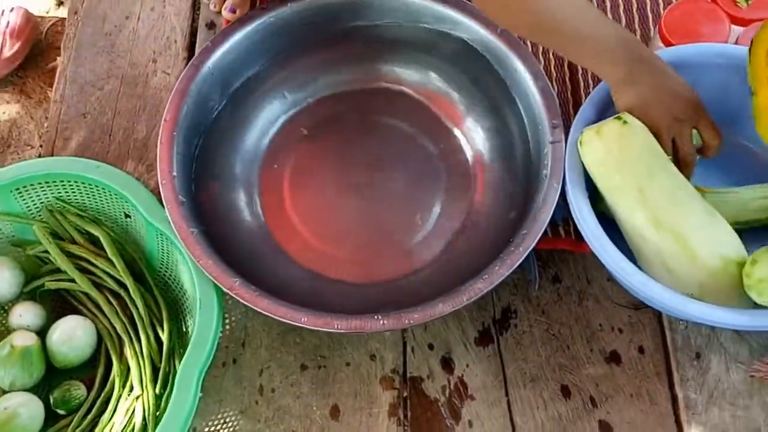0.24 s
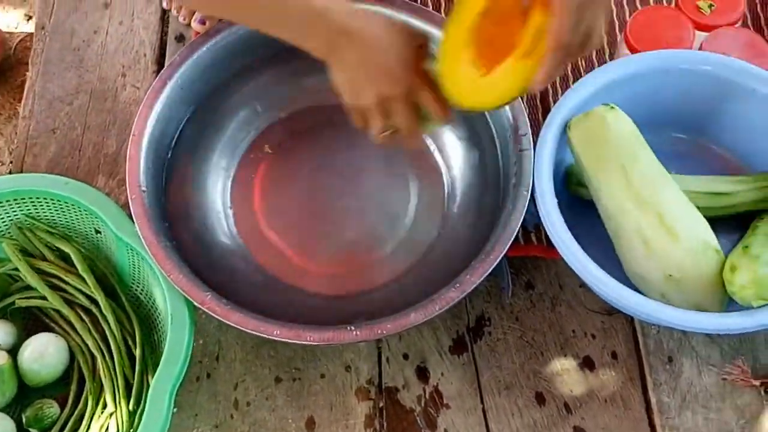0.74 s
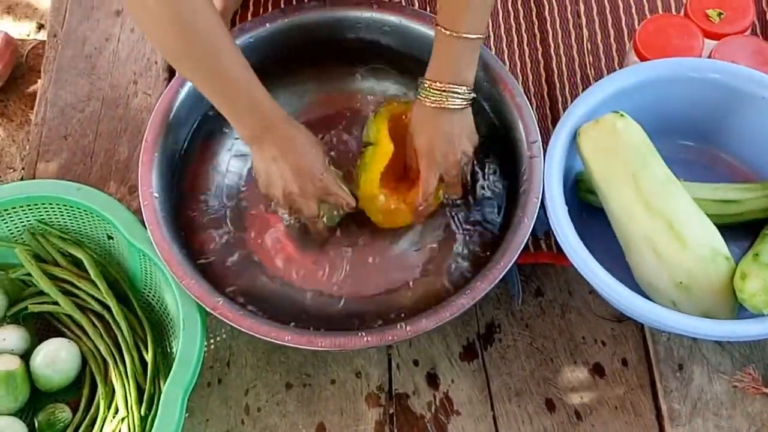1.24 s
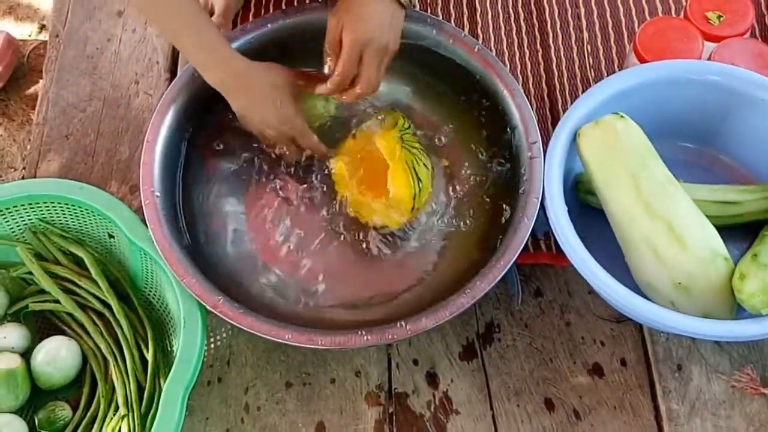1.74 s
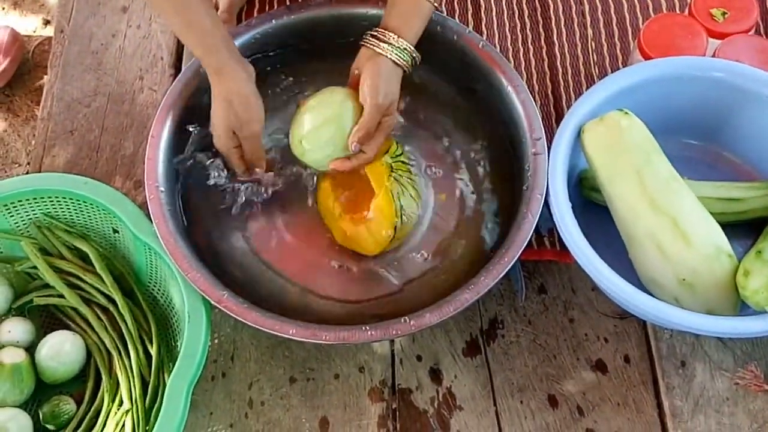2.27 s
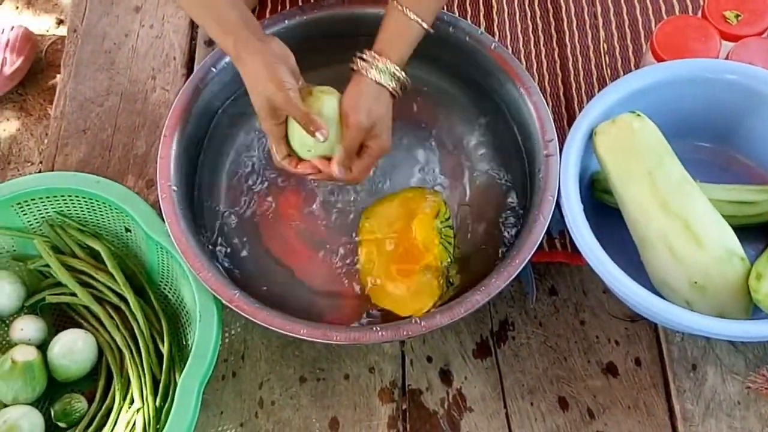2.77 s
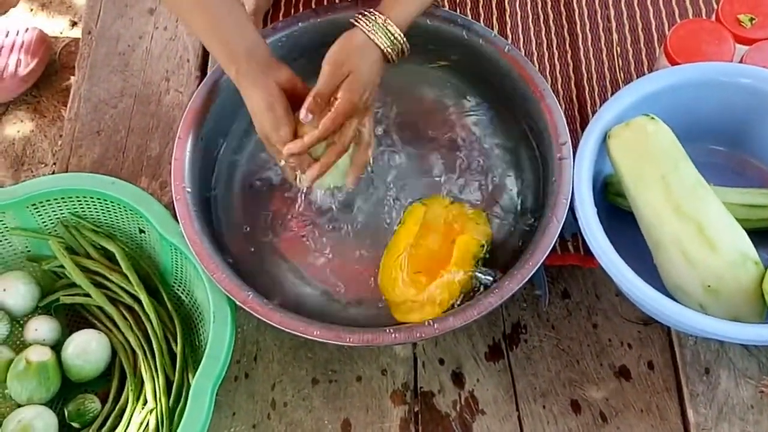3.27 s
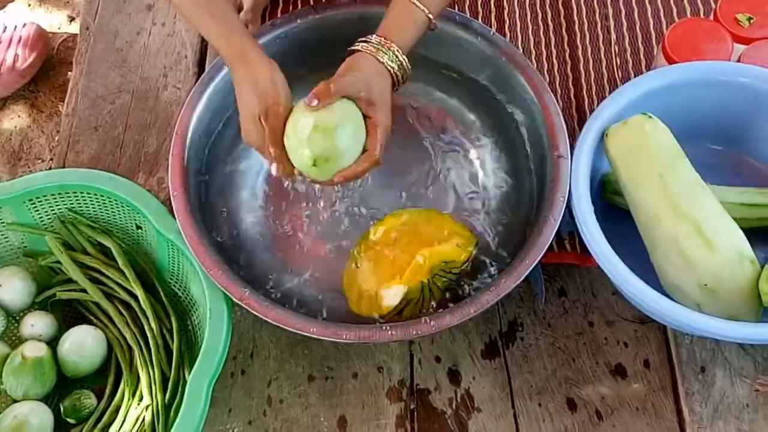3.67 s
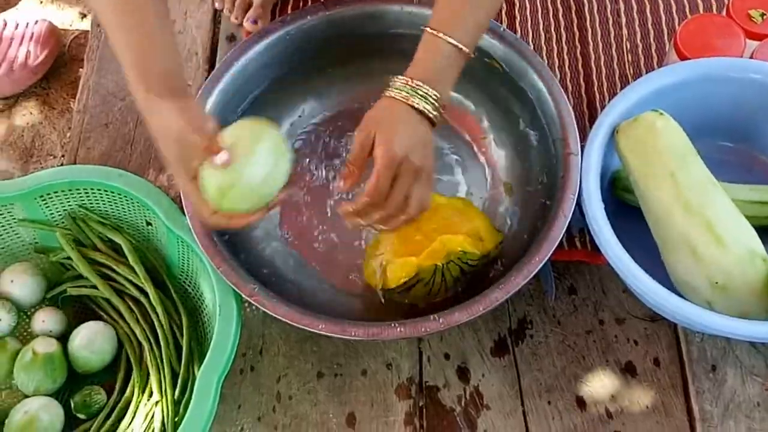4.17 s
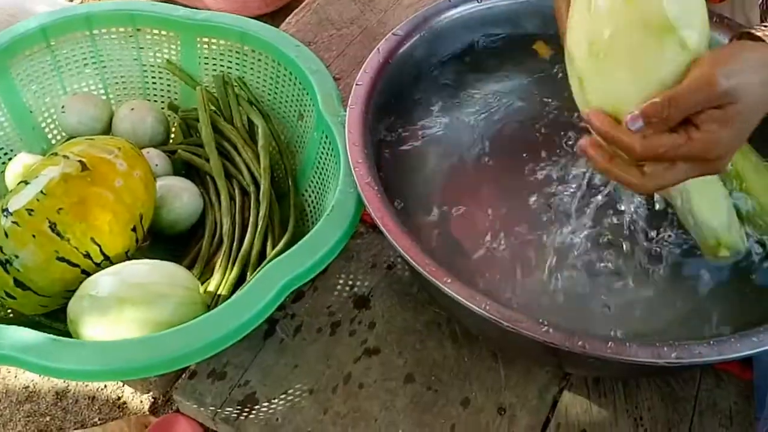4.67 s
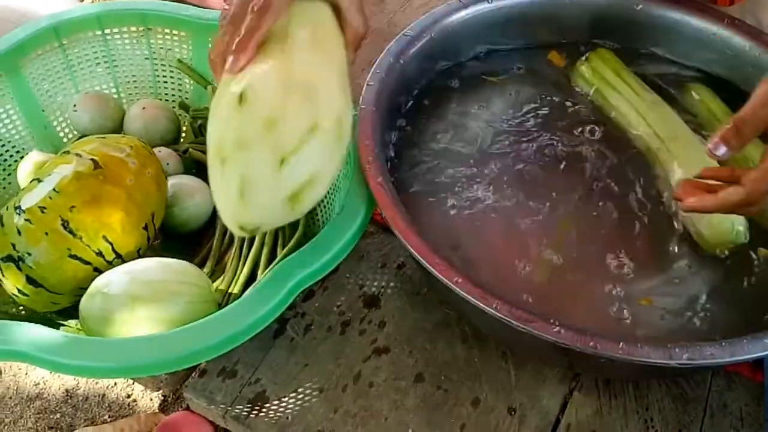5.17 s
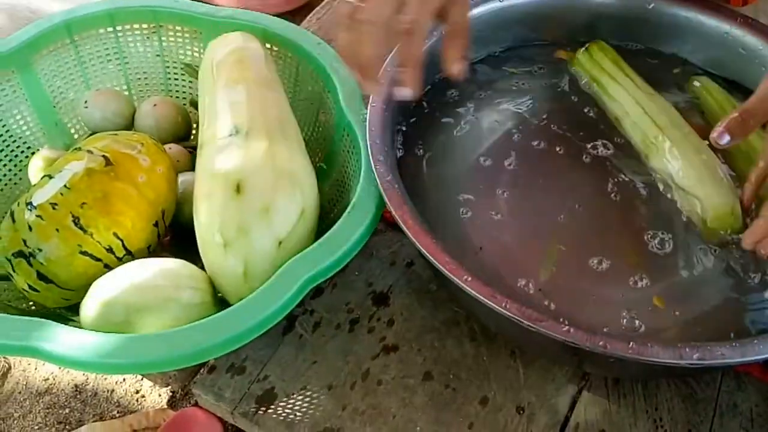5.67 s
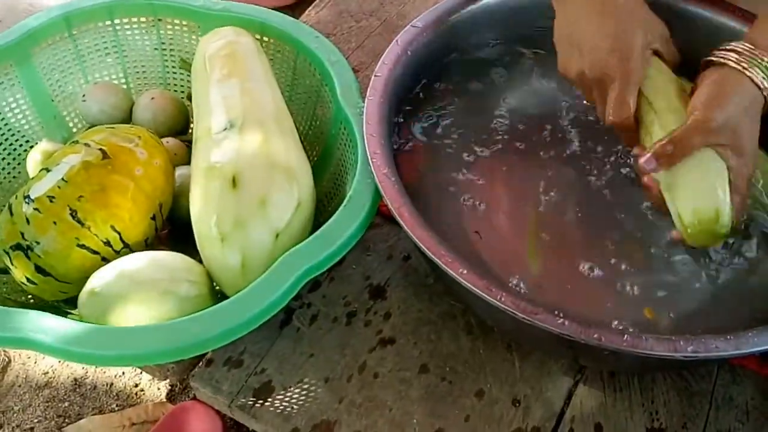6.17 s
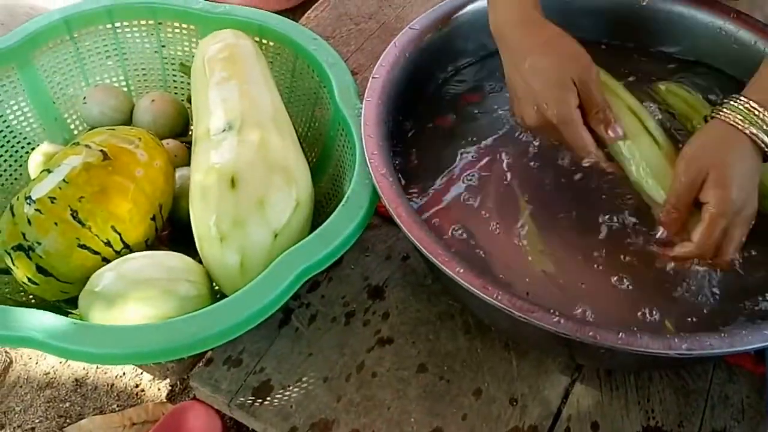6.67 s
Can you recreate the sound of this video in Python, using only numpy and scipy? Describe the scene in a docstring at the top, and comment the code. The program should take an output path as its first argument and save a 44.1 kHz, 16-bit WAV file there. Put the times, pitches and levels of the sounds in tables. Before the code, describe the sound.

Steady deep mortar thuds about twice a second, with hands stirring and dripping water in a metal basin, sharper wooden knocks joining near the end.

```python
"""A wooden deck in a yard: hands rinse vegetables in a metal basin while someone pounds a mortar at a steady pace.
Blows and knocks are dying sines with a click of noise; the grains they shake hiss a moment later.
Drops are short rings that may glide up in pitch; stirred water is many tiny rings over patchy noise.
Spray and drizzle are ticks and puffs of noise, a bird chirps in wavering sines, the basin hums faintly,
and slow, deep noise makes the breeze and its gusts on the microphone."""
import sys
import numpy as np
from scipy import signal
from scipy.io import wavfile
from scipy.ndimage import uniform_filter1d

SR = 44100
rng = np.random.default_rng(int(sys.argv[2]) if len(sys.argv) > 2 else 0)


def wav_out(sig):
    """Save sig, one row per channel (or a flat mono array), as 16-bit PCM at SR to the path in sys.argv[1]."""
    wavfile.write(sys.argv[1], SR, np.round(np.clip(np.atleast_2d(sig).T, -1, 1) * 32767).astype(np.int16))


N = 305613  # length in samples
CHANGE_S = 4.1  # from here the hiss of the hits takes another colour and the deep group is fainter

# pestle blows: start_s, boom_db, octave_db, knock_db, crack_db, hiss_db (shaken grains), sizzle_db, slosh_db
BLOWS = [(-.008, -14.5, -21.5, -27, -37.5, -39, -39.5, -55),
         (0.514, -19.5, -23.5, -22.5, -39, -37.5, -39.5, -58.5),
         (1.038, -14.5, -16, -18.5, -45, -37.5, -40.5, -58.5),
         (1.559, -20, -32.5, -27, -41, -43.5, -44, -56), (2.059, -13.5, -19.5, -17.5, -33, -38, -39, -61),
         (2.582, -14.5, -21.5, -20.5, -37.5, -39, -37.5, -56),
         (3.099, -14, -18, -17.5, -38.5, -38.5, -38, -51), (3.618, -15.5, -15, -16, -31.5, -37.5, -38, -57),
         (4.155, -18, -17, -14.5, -22, -38, -36, -35.5), (4.714, -17, -15, -15.5, -22.5, -36, -42.5, -47.5),
         (5.232, -16, -15.5, -19, -26, -38.5, -41.5, -48), (5.749, -16, -15.5, -17, -33.5, -37, -46, -47),
         (6.272, -24, -18, -17, -19, -35.5, -45.5, -39.5),
         (6.775, -21.5, -25.5, -13.5, -26, -50.5, -46, -52)]
# what the mortar and boards ring with: pitch_hz, level_db, t60_s (time to fade by 60 dB),
# group (rounded, halves to even: 0 boom, 1 octave, 2 knock, 3 crack, 4 deep)
BOARDS = [(260, 10, .025, 1), (105.4, -3, 0.27, 4), (1760, -5, 0.05, 3.5), (2380, -0.5, 0.034, 3.5),
          (157.3, 2, 0.11, 0), (204.7, -0.5, 0.12, 0), (299.3, 5, 0.098, 1), (345, -3, 0.092, 0.5),
          (239, -0.5, 0.079, 1.5), (560, -2, 0.0446, 2), (752, -3.5, 0.064, 2.5), (830, -18.5, 0.15, 1)]
# hands in the basin: start_s, stir_db, drizzle_db
HANDS = [(0, -66, -82), (.3, -62, -86), (.4, -72.5, -82), (.9, -73, -85.5), (1.05, -64, -70.5),
         (1.35, -51.5, -70), (1.54, -46, -70), (1.66, -59, -71), (1.85, -50, -67), (2.0, -57.5, -82),
         (2.22, -58.5, -88), (2.41, -49.5, -57), (2.53, -56, -87), (2.75, -52, -63), (2.88, -57, -75),
         (3.02, -67.5, -79), (3.2, -63, -70.5), (3.45, -41.5, -59.5), (3.53, -52, -60.5), (3.63, -53, -97),
         (4.0, -66, -86.5), (4.1, -72, -68), (4.3, -58, -77), (4.48, -59, -79), (4.62, -43, -66),
         (4.75, -56.5, -74), (5.1, -53, -84.5), (5.67, -60.5, -85.5), (5.95, -46, -73.5), (6.25, -70, -92),
         (6.55, -51.5, -81), (6.93, -50, -79)]


def amp(db):
    """Turns decibels into a plain factor."""
    return 10 ** (np.asarray(db) / 20)


def evened(x):
    """Scales x to an rms level of 1."""
    return x / np.sqrt(np.mean(x ** 2) + 1e-20)


def add(mix, start_s, sound):
    """Adds a sound to the mix at its start time, cutting off what lies outside."""
    at = round(start_s * SR)
    sound = sound[max(-at, 0):]
    part = mix[max(at, 0):][:len(sound)]
    part += sound[:len(part)]


def control(table, index):
    """Follows a table column in dB, with straight lines between its times, and gives factors."""
    rows = np.transpose(table)
    return amp(np.interp(np.arange(N) / SR, rows[0], rows[index]))


def shaped(x, points):
    """Filters x by a gain curve drawn through points of pitch_hz, level_db."""
    point_hz, point_db = np.transpose(points)
    hz = np.fft.rfftfreq(len(x), 1 / SR)
    gain = amp(np.interp(np.log(hz + 1), np.log(point_hz + 1), point_db))
    return np.fft.irfft(np.fft.rfft(x) * gain, len(x))


def coloured(x, points):
    """Filters x by the curve and brings it to rms 1."""
    return evened(shaped(x, points))


def patchy(points, patchy_db):
    """Noise whose level drifts in small patches of time and frequency."""
    z = signal.stft(rng.standard_normal(N + 512), nperseg=512)[2]
    patches = uniform_filter1d(rng.standard_normal(z.shape), 5, axis=0)
    patches = evened(uniform_filter1d(patches, 6, axis=1))
    noise = signal.istft(z * amp(patchy_db * patches), nperseg=512)[1][:N]
    return coloured(noise, points)


def grainy(spread_db, length_s):
    """Short random bumps in level, as from loose grains, at rms 1."""
    bumpy = evened(uniform_filter1d(rng.standard_normal(N), int(length_s * SR)))
    return evened(amp(spread_db * bumpy))


def swell(peak_s, sharp):
    """Level that climbs to 1 at peak_s and sinks again; a higher sharp makes it narrower."""
    u = np.arange(SR // 2) / SR / peak_s
    return (u * np.exp(1 - u)) ** sharp


def ring(hz, t60_s, rise_s, glide=0.):
    """A dying sine with a soft start; the pitch may rise by the share glide, as a bubble nears the surface."""
    t = np.arange(round(1.2 * t60_s * SR) + 50) / SR
    glide_s = 0.38 * t60_s
    bent_t = t + glide * (t - glide_s * (1 - np.exp(-t / glide_s)))
    return np.sin(2 * np.pi * hz * bent_t) * amp(-60 * t / t60_s) * (1 - np.exp(-t / rise_s))


def burst(hz, share, t60_s):
    """A short dying puff of noise in a band share x hz wide on each side."""
    band = signal.butter(N=2, Wn=[hz * (1 - share), hz * (1 + share)], btype="band", fs=SR)
    t = np.arange(round(t60_s * SR)) / SR
    noise = evened(signal.lfilter(*band, rng.standard_normal(4000)))[-len(t):]
    return noise * amp(-60 * t / t60_s) * (1 - np.exp(-t / 0.00016))


def lump(db, low_hz, high_hz, length_s):
    """A soft-edged piece of band noise."""
    n = round(length_s * SR)
    band = signal.butter(N=2, Wn=[low_hz, high_hz], btype="band", fs=SR)
    noise = signal.lfilter(*band, rng.standard_normal(SR // 4))
    return amp(db) * evened(noise[-n:]) * signal.windows.tukey(n, .4)


def scattered(sounds, per_s, spread_db):
    """Each sound repeats at random moments and sizes, about per_s a second in all."""
    shape = (len(sounds), N)
    size = amp(spread_db * np.minimum(rng.exponential(1, shape), 4))
    trains = size * (rng.random(shape) < per_s / len(sounds) / SR)
    return sum(signal.oaconvolve(train, sound)[:N] for train, sound in zip(trains, sounds))


def contact_snap():
    """Level of the first contact of a hit: it starts at full and fades 60 dB in 47 ms."""
    return amp(-60 * np.arange(SR // 10) / SR / 0.047)


def pestle_blows():
    """Each blow rings all modes of mortar and boards, slightly detuned, and shakes the grains."""
    # level of the deep group for every blow: before 4.1 s, from then on [dB]
    deep_levels = [-27, -39.5]
    tone, contact, shake, sizzle = parts = np.zeros((4, N))
    for start_s, boom_db, octave_db, knock_db, crack_db, hiss_db, sizzle_db, _ in BLOWS:
        group_db = (boom_db, octave_db, knock_db, crack_db, deep_levels[int(start_s > CHANGE_S)])
        detune = 1 + 0.027 * rng.standard_normal(len(BOARDS))
        for k, (hz, db, t60_s, group) in enumerate(BOARDS):
            level = amp(db + group_db[round(group)])
            if k == 0:  # the thud of the pestle leads
                add(tone, start_s + .002, level * ring(hz * detune[k], t60_s, .004))
            else:  # the boards start 1.5 ms later, swinging the opposite way
                add(tone, start_s + .0035, -level * ring(hz * detune[k], t60_s, .0015))
        add(contact, start_s + 0.0026, amp(crack_db) * contact_snap())
        add(shake, start_s, amp(hiss_db) * swell(0.044, 2.9))
        add(sizzle, start_s, amp(sizzle_db) * swell(0.057, 5.0))
    return parts


def wood_knocks():
    """Sharper knocks: three quick body rings, plus the low modes of the boards and shaken grains."""
    # start_s, level_db, body_hz, low_db (board modes), crack_db, hiss_db, sizzle_db
    knocks = [(4.05, -19.5, 640, -36, -58, -65.5, -62), (5.451, -31, 552, -28.5, -41.5, -51.5, -73),
              (5.789, -5.5, 656, -24, -22.5, -46.5, -46.5), (6.083, -1.5, 665, -25, -19, -41, -48.5),
              (6.378, -4, 695, -22.5, -22.5, -36.5, -45.5), (6.689, -6, 697, -20.5, -23.5, -38.5, -51)]
    tone, contact, shake, sizzle = parts = np.zeros((4, N))
    for start_s, db, hz, low_db, crack_db, hiss_db, sizzle_db in knocks:
        add(tone, start_s, amp(db) * ring(hz, 0.029, 0.00093))
        add(tone, start_s, amp(db - 13) * ring(1.27 * hz, 0.038, 0.00027))
        add(tone, start_s, amp(db - 19) * ring(0.794 * hz, 0.0503, 0.0019))
        for mode_hz, mode_db, t60_s, group in BOARDS:
            if group < 2:
                add(tone, start_s, amp(mode_db + low_db) * ring(mode_hz, 0.88 * t60_s, 0.0029))
        add(contact, start_s, amp(crack_db) * contact_snap())
        add(shake, start_s, amp(hiss_db) * swell(0.023, 0.44))
        add(sizzle, start_s, amp(sizzle_db) * swell(0.071, 11.0))
    return parts


def struck():
    """Blows and knocks ring the wood and crack; loose grains shaken by each hit hiss a moment later."""
    # colours of the noises, and of the hiss from 4.1 s on: pitch_hz, level_db
    hiss_colour, sizzle_colour = [(250, -6), (500, -5.5), (860, -11), (1200, -1.5), (1550, -8), (2250, 0),
                                  (2900, -12), (4000, -17), (5500, -25.5), (15000, -40)], [(1500, -19.5), (3000, -11.5), (4200, 1), (6200, 1.5),
                                                (8000, 5), (10000, -2.5), (12500, -4.5), (15000, -4.5)]
    crack_colour, later_colour = [(500, -49.5), (1200, 10), (1800, 7.5), (2400, 6.5), (4000, -19.5),
                                  (6000, -42.5), (15000, -31.5)], [(500, 4.5), (1200, -5), (1900, 1), (2200, -4), (2480, 3.5),
                                                 (2900, 3.5), (4000, -2), (6300, -6.5), (10000, -2),
                                                 (13000, 9.5)]
    tone, contact, shake, sizzle = pestle_blows() + wood_knocks()
    # the boards radiate little deep bass
    tone = signal.lfilter(*signal.butter(N=3, Wn=90, btype="high", fs=SR), tone)
    hiss = sizzle * grainy(1.0, 0.0021) * patchy(sizzle_colour, 3.8)
    hiss += shake * grainy(1.5, 0.0056) * patchy(hiss_colour, 4.4)
    heard_hiss = np.where(np.arange(N) < CHANGE_S * SR, hiss, shaped(hiss, later_colour))
    return tone + contact * patchy(crack_colour, 2.1) + heard_hiss


def wind():
    """A lumpy breeze and gusts that thump the microphone: deep rumble and buffeting noise."""
    # level of the steady breeze: start_s, level_db
    steady_levels = [(0, -54), (.2, -62.5), (.35, -59.5), (.63, -53), (.83, -73), (1.0, -59.5),
                     (1.3, -67.5), (1.62, -53.5), (1.93, -66.5), (2.39, -53.5), (2.6, -72), (3.0, -60),
                     (3.28, -52), (3.7, -43.5), (4.08, -56.5), (4.45, -57), (5.08, -63.5), (5.42, -57),
                     (5.9, -65.5), (6.3, -60), (6.93, -50)]
    # gusts: start_s, length_s, level_db; the first row is the deep thump that comes with the first blow
    gust_list = [(0, 0.058, -37.5), (0.688, .035, -42), (0.742, .025, -49.5), (0.918, 0.042, -62),
                 (2.172, .1, -54.5), (3.229, .04, -46), (3.325, 0.081, -39.5), (3.512, 0.094, -33.5),
                 (3.801, 0.14, -35.5), (3.947, 0.05, -37), (4.359, .05, -53.5), (4.5, .08, -66),
                 (5.141, 0.096, -53.5), (5.534, 0.08, -47.5)]
    # colours of the rumble and of the buffeting: pitch_hz, level_db
    deep_colour, buffet_colour = [(20, -39.5), (40, 1.5), (60, -3.5), (80, 1.5), (130, -22.5), (300, -69)], [(40, -35.5), (75, -12.5), (105, -0.5), (150, -12),
                                                  (250, -22.5), (500, -58)]
    gusts, steady = np.zeros(N), control(steady_levels, index=1)
    for start_s, length_s, db in gust_list:
        add(gusts, start_s, amp(db) * signal.windows.tukey(round(length_s * SR), .6))
    deep = steady * grainy(4.2, 0.093) + amp(-7.5) * gusts
    buffet = amp(-3) * steady * grainy(4.5, 0.074) + gusts
    return deep * patchy(deep_colour, 1.8) + buffet * patchy(buffet_colour, 2.7)


def yard_noise():
    """The constant faint noise of the yard: coloured noise with drifting patches."""
    # pitch_hz, level_db
    yard_colour = [(120, -4), (600, -12.5), (1300, -24), (1600, -9.5), (2250, 3), (2830, -6), (3300, -12.5),
                   (4000, -8), (5500, -30), (15000, -43.5)]
    return amp(-62.5) * patchy(yard_colour, 3.3)


def stirred_water():
    """Water stirred by hands and shaken by blows: tiny bubble rings over noise, with small plops."""
    # colour of the water noise: pitch_hz, level_db
    water_colour = [(290, -58), (500, -49), (616, -14), (779, -26), (959, -18.5), (1150, -30), (1360, -3),
                    (2430, 3.5), (3990, -14), (5190, -71), (8780, -120)]
    stir, slosh = control(HANDS, index=1), np.zeros(N)
    for start_s, *_, slosh_db in BLOWS:
        add(slosh, start_s, amp(slosh_db) * swell(0.11, 2.97))
    bubble_rings = [ring(hz, 20. / hz, 0.00018, 0.18) for hz in np.geomspace(900, 4500, num=16)]
    bubbles = coloured(scattered(bubble_rings, 2160., 9.1), [(500, 2.5), (3000, 8.5), (5000, -5.0)])
    plop_rings = [ring(hz, 0.018, 0.00093, .12) for hz in np.geomspace(1100, 2900, num=9)]
    plops = scattered(plop_rings, per_s=45, spread_db=3.)
    body = 0.2 * bubbles + 0.4 * patchy(water_colour, 5.4)
    return (stir + slosh) * body + stir * amp(-3) * plops


def drizzle_and_mist():
    """Fine drizzle from the hands and a mist after each blow: random ticks and hiss, with spray clicks."""
    # colour of ticks and hiss: pitch_hz, level_db
    fine_colour = [(2500, -17.5), (4500, -1.5), (6200, -2), (8000, -10.5), (10000, -8.5), (15000, -2)]
    drizzle, mist = control(HANDS, index=2), np.zeros(N)
    for start_s, *_ in BLOWS:
        add(mist, start_s, amp(-61.5) * swell(0.069, 5.7))
    ticks = amp(4. * np.minimum(rng.exponential(1, N), 4))
    ticks = ticks * (rng.random(N) < 500. / SR) * rng.choice([-1, 1], N)  # about 500 a second
    fine = 1.1 * coloured(ticks, fine_colour) + 1.7 * patchy(fine_colour, 1.4)
    fleck_puffs = [burst(hz, 0.12, 0.019) for hz in np.geomspace(5600, 10300, num=7)]
    flecks = scattered(fleck_puffs, per_s=28, spread_db=3.5)
    return (drizzle + mist) * fine + drizzle * amp(14) * flecks


def hollow_notes():
    """Short hollow, wavering notes: noise in a very narrow band."""
    # start_s, level_db, pitch_hz, length_s
    hollows = [(0.171, -65.5, 718, 0.053), (4.538, -47, 652, 0.081), (5.134, -65.5, 646, 0.07),
               (5.874, -57.5, 614, 0.062), (6.163, -54, 617, 0.06), (6.601, -73, 726, .045)]
    out = np.zeros(N)
    for start_s, db, hz, length_s in hollows:
        add(out, start_s, lump(db, 0.96 * hz, 1.04 * hz, length_s))
    return out


def spray_clicks():
    """The clearest spray clicks: a narrow puff of noise with a wide one under it."""
    # start_s, level_db, pitch_hz
    spray = [(0.178, -38, 5640), (0.521, -37, 8050), (1.024, -37.5, 8240), (1.239, -44, 5500),
             (1.328, -43, 7200), (1.38, -50, 6030), (1.52, -49, 7600), (1.556, -39.5, 6140),
             (1.726, -43, 6700), (1.855, -45, 6440), (1.869, -39, 8600), (2.073, -36, 6360),
             (2.33, -40, 9300), (2.389, -40, 9900), (2.427, -37, 5800), (2.454, -40, 9900),
             (2.542, -45, 9300), (2.584, -38, 8300), (2.714, -38, 7800), (2.73, -40, 6300),
             (2.742, -44, 6330), (2.765, -47, 5600), (2.86, -37.5, 6500), (3.076, -46.5, 6400),
             (3.102, -42, 7600), (3.3, -45, 6860), (3.318, -43, 6600), (3.326, -51, 5950),
             (3.432, -40, 8440), (3.445, -44, 6160), (3.475, -40, 7300), (3.511, -39.5, 7600),
             (4.523, -34.5, 8600), (4.549, -44, 9900), (5.79, -43, 7100), (5.984, -41.5, 9560),
             (5.999, -50, 9600), (6.083, -46, 9450), (6.169, -42, 9800), (6.231, -34.5, 10000),
             (6.378, -45, 6900)]
    out = np.zeros(N)
    for start_s, db, hz in spray:
        wide_db = db + 5 - 1.5 * hz / 1000  # fainter the higher the click
        add(out, start_s - .001, amp(db) * burst(hz, 0.12, 0.019))
        add(out, start_s - .001, amp(wide_db) * burst(5000, 0.51, 0.033))
    return out


def vegetable_bumps():
    """Vegetables bump softly on the basin floor: short lumps of low band noise."""
    # start_s, level_db, pitch_hz (the band spans 0.68 to 1.124 times this), length_s
    bumps = [(0.716, -55.5, 240, 0.049), (1.141, -40.5, 163, 0.053), (1.235, -48, 248, 0.067),
             (1.435, -42.5, 275, 0.085), (1.756, -46.5, 240, 0.086), (1.971, -49.5, 242, 0.1),
             (5.469, -31, 192, 0.047), (5.519, -49, 153, 0.054)]
    out = np.zeros(N)
    for start_s, db, hz, length_s in bumps:
        add(out, start_s, lump(db, 0.68 * hz, 1.124 * hz, length_s))
    return out


def bird():
    """A bird chirps: gliding sines whose pitch and level waver."""
    # start_s, length_s, from_hz, to_hz, level_db
    chirps = [(0.917, 0.11, 2930, 3420, -60), (1.246, 0.048, 2900, 3430, -59),
              (1.946, 0.057, 3010, 3220, -55.5)]
    out = np.zeros(N)
    for start_s, length_s, from_hz, to_hz, db in chirps:
        n = round(length_s * SR)
        waver = evened(uniform_filter1d(rng.standard_normal((2, 8000)), 150, axis=1))[:, :n]
        hz = np.linspace(from_hz, to_hz, n) * (1 + 0.014 * waver[0])
        tone = np.sin(2 * np.pi * np.cumsum(hz) / SR)
        add(out, start_s, amp(db + 4.5 * waver[1]) * tone * signal.windows.tukey(n, .6))
    return out


def falling_drops():
    """Drops and bubbles ring, with a splat of noise as the surface bursts."""
    # start_s, level_db, pitch_hz, t60_s, glide (pitch rise as a share), splat_db
    drops = [(1.239, -29, 840, 0.014, 0.03, -39), (1.374, -36, 2160, 0.03, 0.034, -53),
             (1.42, -40, 2780, .035, .1, -46.5), (1.525, -33.5, 2220, 0.042, 0.19, -44),
             (1.641, -36, 1760, 0.046, .1, -55), (1.709, -34, 1200, .026, 0.13, -44),
             (1.822, -35, 2190, 0.032, .1, -47), (1.895, -34.5, 2180, 0.032, 0.12, -53),
             (2.3, -42, 1070, 0.037, 0, -63), (2.329, -34, 2150, 0.044, 0.15, -43),
             (2.349, -39.5, 836, 0.037, 0.033, -39), (2.377, -36.5, 1305, 0.039, 0.00053, -46),
             (2.391, -38, 3500, 0.031, 0.003, -45), (2.402, -19.5, 952, 0.063, 0.14, -41),
             (2.417, -33.5, 2320, 0.028, 0.014, -50), (2.429, -30, 950, .045, 0, -57),
             (2.433, -27.5, 1250, .036, 0.16, -52), (2.44, -29.5, 1680, .042, 0.41, -50),
             (2.452, -41, 1220, .065, 0.95, -64), (2.488, -24, 1040, 0.014, 0.071, -51),
             (2.544, -30, 1830, 0.025, 0.023, -47), (2.551, -26.5, 900, 0.02, 0.038, -55),
             (2.61, -35, 1720, 0.076, 0.035, -51), (2.697, -34, 1390, .035, .11, -44),
             (2.72, -34, 2160, 0.039, 0, -41), (2.736, -26, 2170, 0.024, 0.15, -35.5),
             (2.738, -33, 2920, .033, 0.089, -54), (2.763, -47, 2070, .03, .05, -34.5),
             (2.786, -33, 1304, .038, 0, -54), (2.814, -41.5, 1160, 0.052, 0.17, -54),
             (2.842, -28.5, 1095, 0.04, 0.0067, -58), (2.857, -33, 827, 0.031, .12, -49),
             (2.868, -30, 1250, 0.029, .25, -55), (2.869, -30, 1756, .053, 0.073, -59),
             (2.877, -34, 2230, 0.046, 0.13, -53), (3.061, -28.5, 1710, 0.02, 0.15, -52),
             (3.16, -29.5, 2400, 0.052, 0, -56), (3.197, -27.5, 806, 0.019, 0.17, -56),
             (3.235, -27.5, 1200, .025, 0.18, -56), (3.238, -30.5, 1830, 0.021, 0.061, -57),
             (3.32, -36, 840, 0.098, 0.99, -58), (3.325, -36.5, 2250, .04, 0.072, -47),
             (3.364, -22.5, 1540, 0.023, .19, -44), (3.38, -34.5, 2120, 0.055, 0.26, -44),
             (3.405, -35.5, 900, 0.023, .21, -40), (3.475, -27.5, 1377, 0.048, 0.06, -58),
             (3.539, -32, 2140, 0.021, 0.037, -68), (3.596, -21, 1710, 0.013, 0.097, -49),
             (3.999, -21, 2300, 0.034, .11, -45), (4.27, -25.5, 3030, 0.029, 0.081, -31),
             (4.278, -28.5, 1250, .03, 0.2, -50), (4.28, -28.5, 2570, .036, 0, -43),
             (4.318, -35, 1700, 0.022, .4, -62), (4.38, -32.5, 2420, 0.047, 0.14, -42),
             (4.525, -42, 3030, .029, .02, -46.5), (4.546, -42, 644, 0.14, 0.18, -44),
             (4.607, -28.5, 2120, 0.021, .1, -54), (4.611, -39, 710, 0.081, 0.19, -55),
             (4.647, -27, 2386, 0.04, 0.15, -43), (4.665, -33, 937, .041, 0.35, -39.5),
             (5.069, -22, 1967, 0.019, 0, -42.5), (5.14, -30, 1410, 0.021, 0.064, -47),
             (5.175, -42.5, 1250, 0.047, 0.16, -63), (5.215, -39, 1810, 0.04, 0.15, -57.5),
             (5.52, -37.5, 2920, 0.029, 0.15, -53), (6.206, -32.5, 1970, 0.062, .45, -51),
             (6.241, -28, 2450, .021, 0, -49)]
    out = np.zeros(N)
    for start_s, db, hz, t60_s, glide, splat_db in drops:
        add(out, start_s, amp(db) * ring(hz, t60_s, 0.0011, glide))
        add(out, start_s, amp(splat_db) * burst(2800, 0.43, .025))
    return out


def basin_hum():
    """The basin hums faintly: steady sines with a grainy level that swells and sinks."""
    # modes: pitch_hz, level_db
    modes = [(1090, -4), (1820, 2.5)]
    # swelling: start_s, level_db
    hum_levels = [(1.64, -99), (1.7, -60.5), (1.9, -65.5), (1.96, -58.5), (2.051, -52.5), (2.08, -89)]
    out = np.zeros(N)
    for hz, db in modes:
        tone = np.sin(2 * np.pi * hz * np.arange(N) / SR)
        out += amp(db) * control(hum_levels, 1) * grainy(3.2, 0.026) * tone
    return out


def falling_handful():
    """A handful of water falls back: two puffs of noise at once."""
    out, start_s = np.zeros(N), 4.852
    add(out, start_s, amp(-34.0) * burst(2900, 0.09, .09))
    add(out, start_s, amp(-42) * burst(2800, 0.17, .09))
    return out


def yard_echo(x, t60_s=0.27):
    """Sparse, dying echoes of random sign from walls and roof, then coloured."""
    # pitch_hz, level_db
    echo_colour = [(100, 0), (400, -5), (700, -6.5), (1200, -4.5), (2400, -6.5), (4000, -1.5), (8000, -5)]
    taps = np.zeros(SR // 2)
    at = np.arange(300, SR // 2 - 20, 20)
    sign = rng.choice([-1., 1.], len(at))
    taps[at + rng.integers(0, 20, len(at))] = sign * amp(-60 * at / SR / t60_s)
    echoes = signal.fftconvolve(x, taps / np.linalg.norm(taps))[:N]
    return shaped(echoes, echo_colour)


def scene():
    """Adds up hits, water, their echoes, bird, hum and air."""
    hits = struck()
    air = wind() + yard_noise()
    wet = stirred_water() + drizzle_and_mist() + hollow_notes() + spray_clicks()
    wet += vegetable_bumps() + falling_drops() + falling_handful()
    echoes = yard_echo(amp(-7) * (hits + wet))
    return (hits + wet + echoes + bird() + basin_hum() + air)[None]


def record(dry):
    """The colour of the small microphone, then the band limit."""
    # pitch_hz, level_db
    mic_colour = [(20, -16.5), (40, 2.5), (80, 0.5), (4000, 3), (4650, -4.5), (5000, -17), (5700, -5.5),
                  (6400, -5), (7400, -13.5), (8100, -15.5), (9100, -7.5), (9800, -1), (10700, -5),
                  (11500, -14), (13200, -24.5), (15300, -30)]
    heard = shaped(np.pad(dry[0], 2000), mic_colour)[None, 2000:-2000]
    low_pass = signal.firwin(511, 15700, window=("kaiser", 9), fs=SR)  # cutoff in Hz
    return signal.oaconvolve(heard, low_pass[None], "same")


dry = scene()
out = record(dry)
wav_out(out)
```